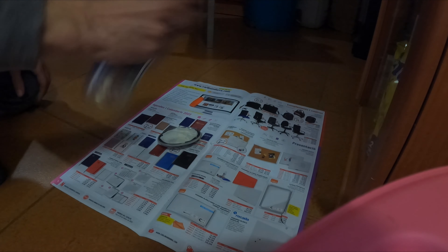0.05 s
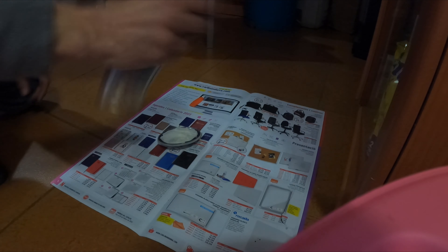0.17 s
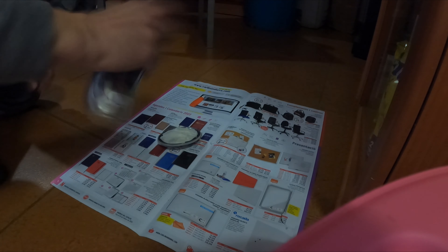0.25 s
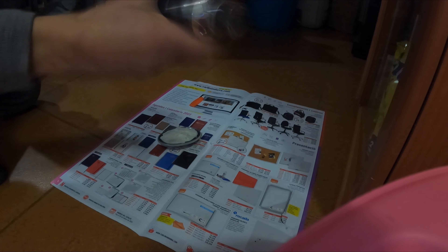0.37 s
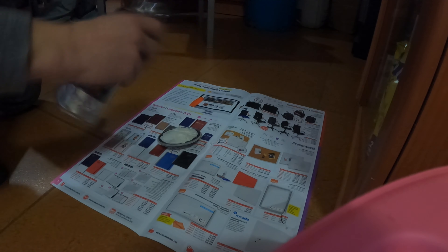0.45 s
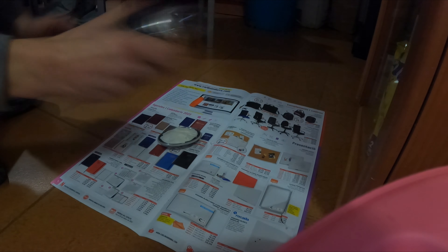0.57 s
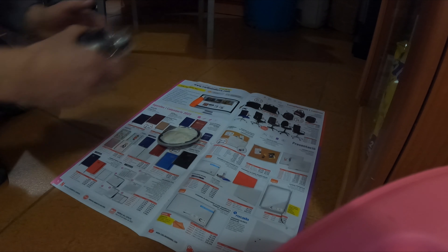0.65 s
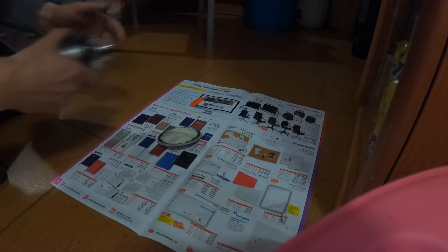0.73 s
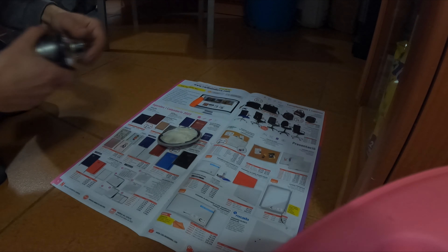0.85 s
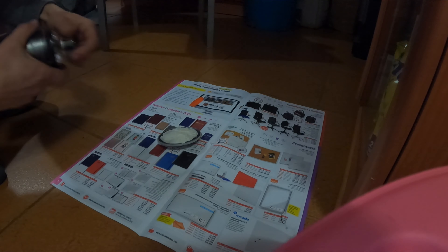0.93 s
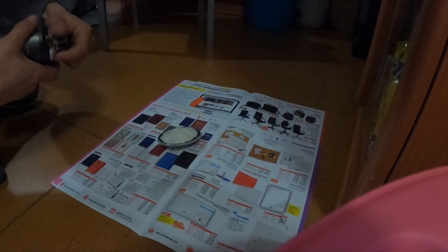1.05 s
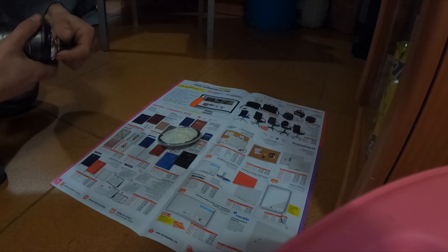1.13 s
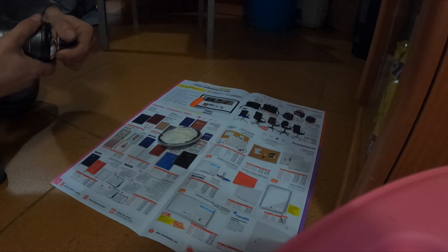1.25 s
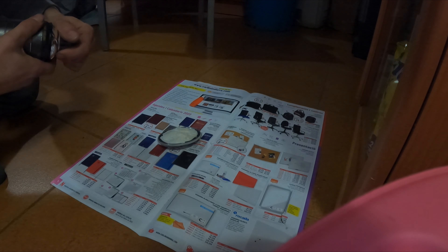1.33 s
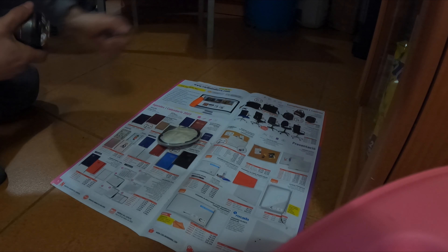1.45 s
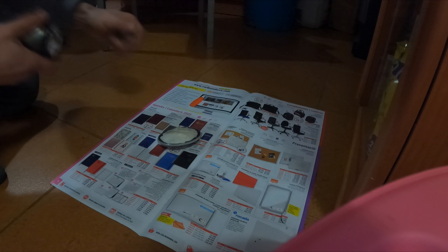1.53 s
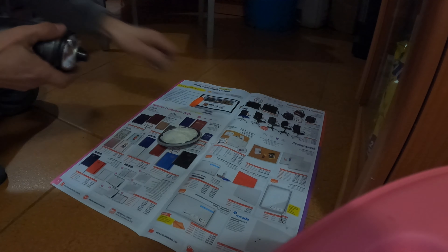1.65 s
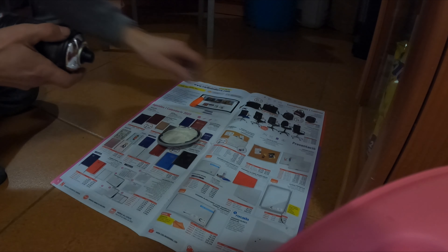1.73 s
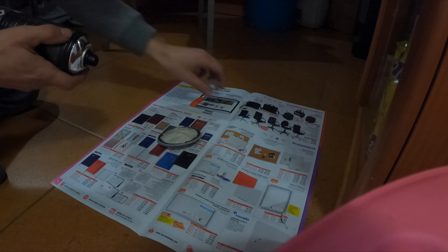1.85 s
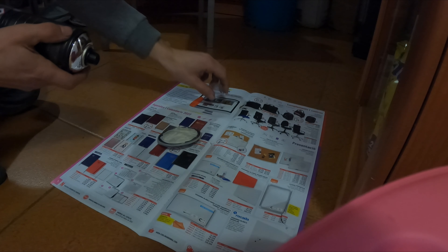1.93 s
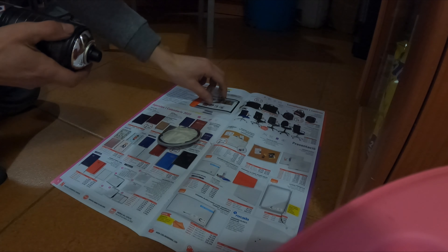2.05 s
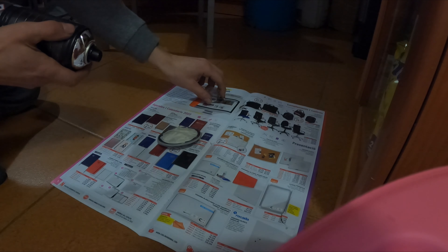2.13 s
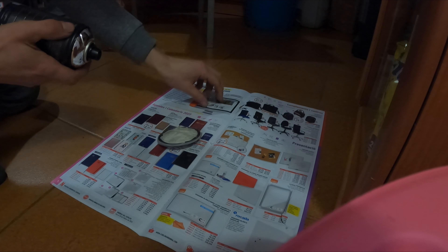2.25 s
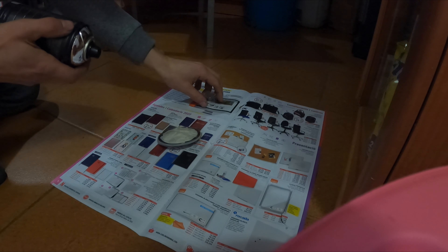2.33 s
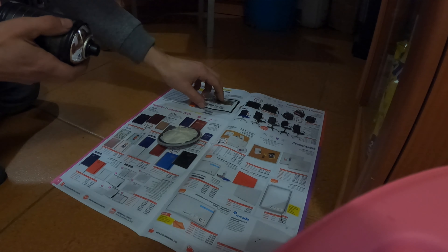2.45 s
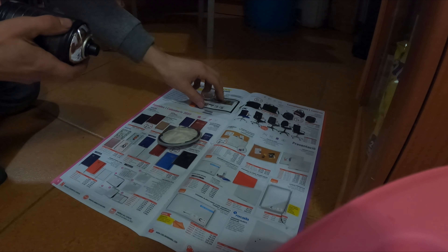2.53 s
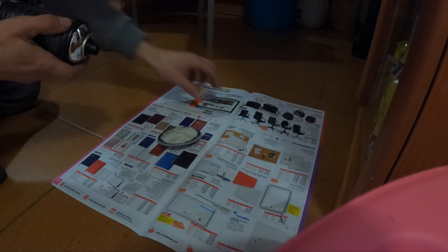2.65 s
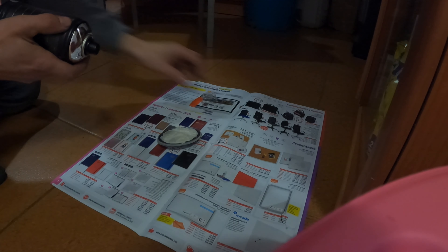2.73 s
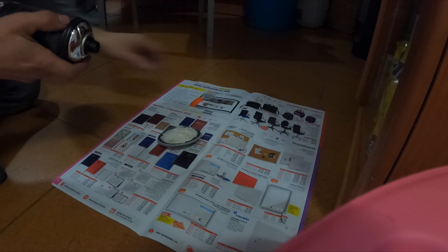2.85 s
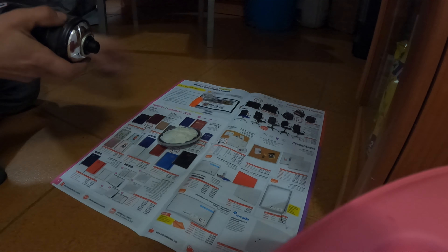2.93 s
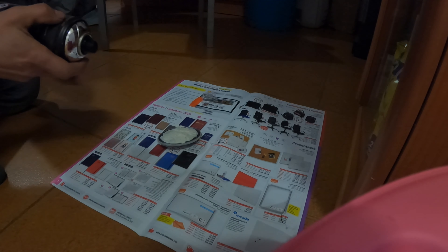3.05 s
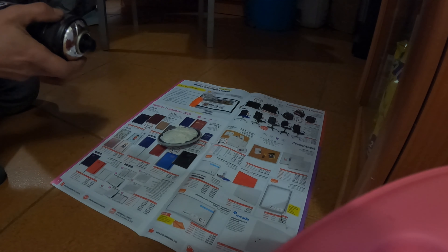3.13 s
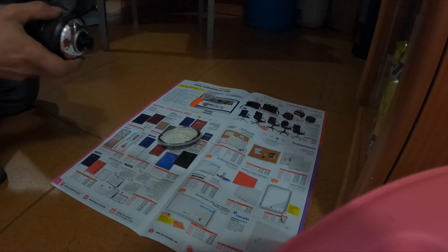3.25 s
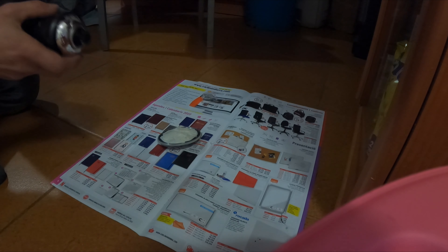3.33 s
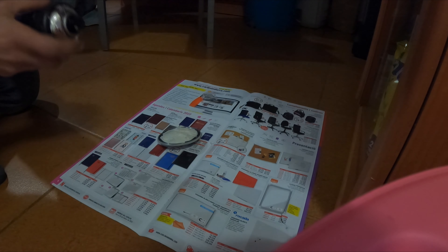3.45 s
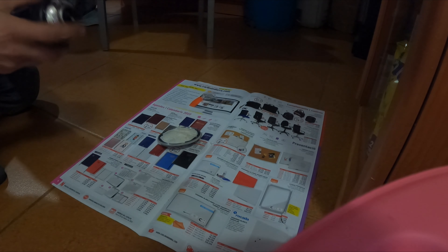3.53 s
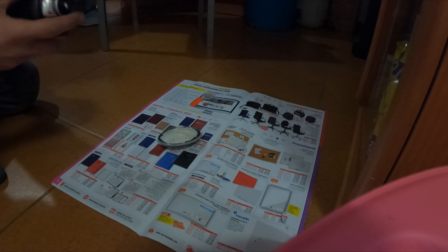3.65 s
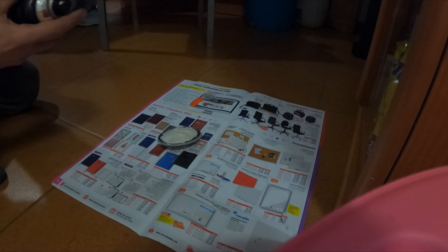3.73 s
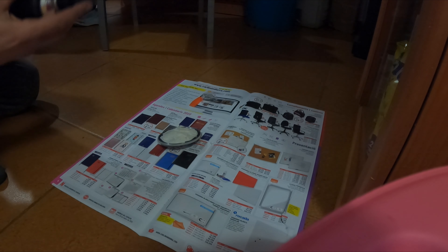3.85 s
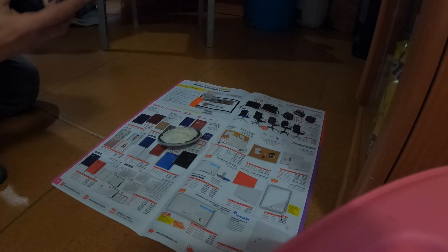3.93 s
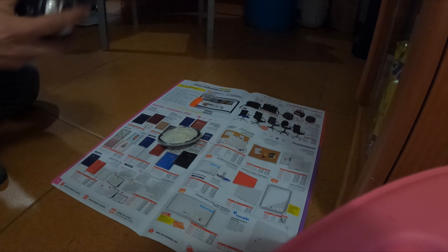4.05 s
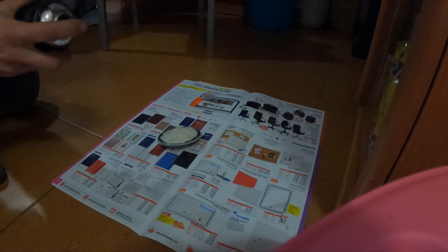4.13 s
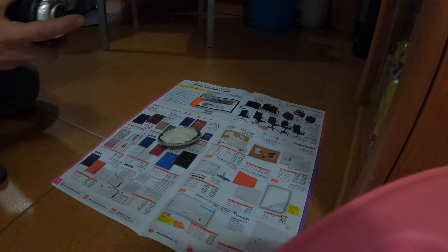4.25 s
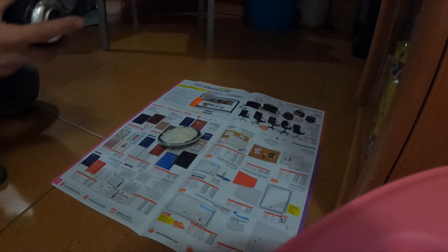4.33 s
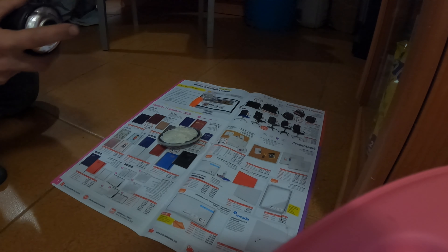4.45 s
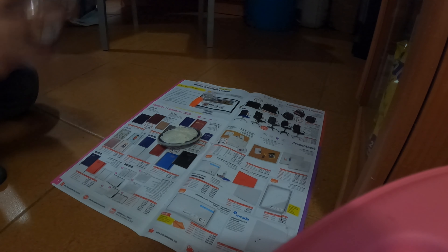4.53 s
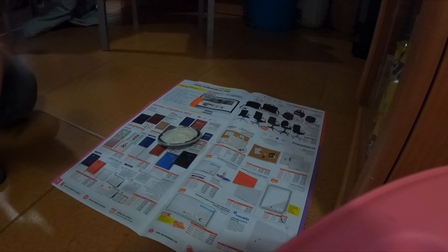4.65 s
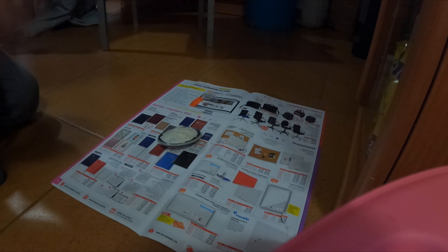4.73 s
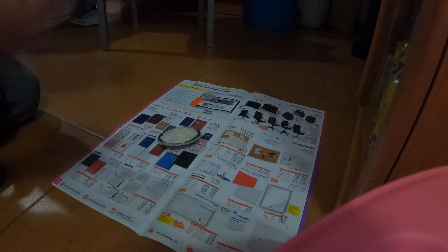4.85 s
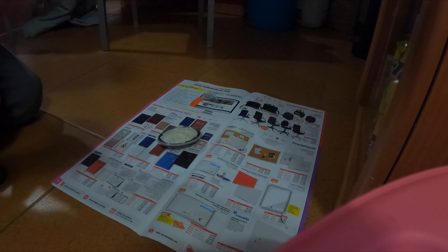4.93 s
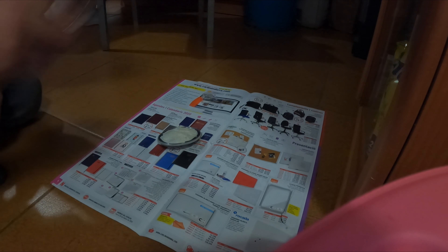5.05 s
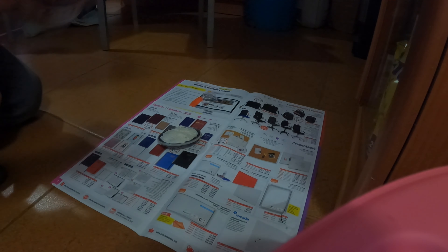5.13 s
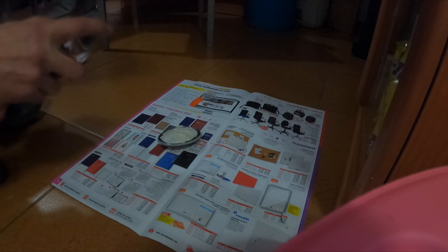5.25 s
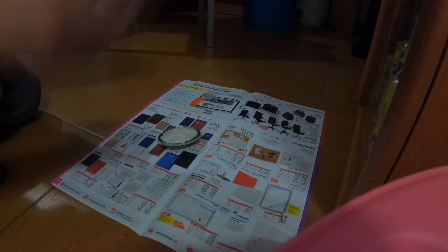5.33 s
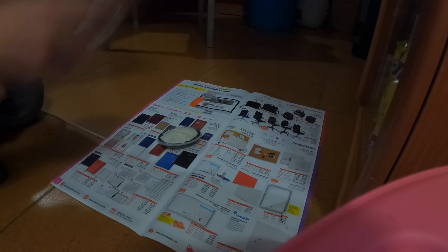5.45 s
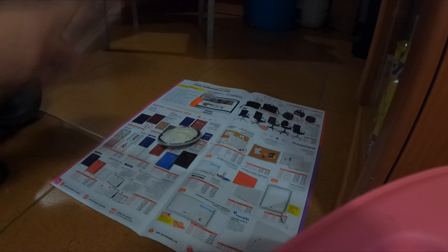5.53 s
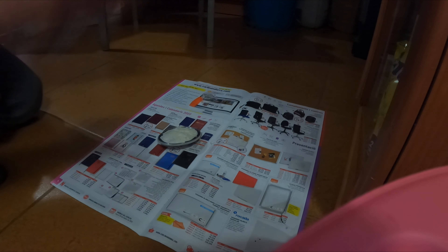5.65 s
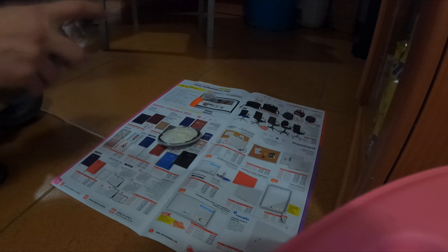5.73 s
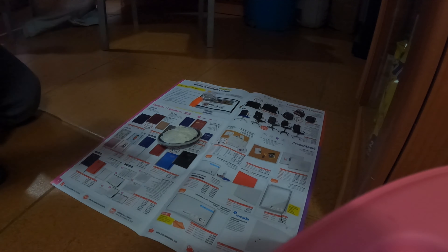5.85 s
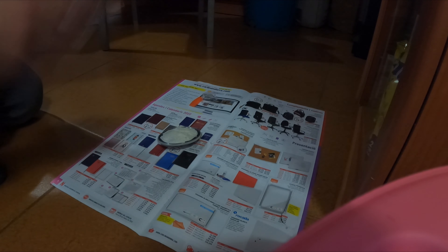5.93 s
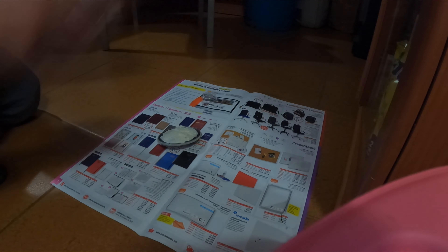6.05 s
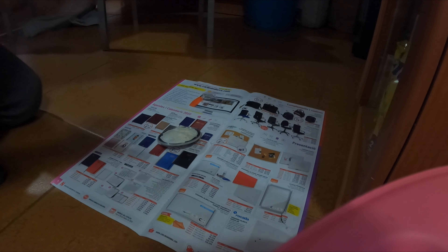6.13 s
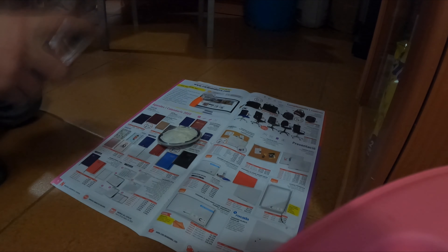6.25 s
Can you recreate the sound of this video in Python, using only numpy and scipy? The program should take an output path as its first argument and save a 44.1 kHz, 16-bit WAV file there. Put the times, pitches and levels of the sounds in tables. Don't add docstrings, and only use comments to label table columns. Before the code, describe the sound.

Close, dry rattle of a mixing ball in a small aerosol can: loose swirling, tumbling to rest, faint taps, then fast vigorous shaking.

```python
import sys
import numpy as np
from scipy import signal
from scipy.fft import rfft, irfft
from scipy.io import wavfile

SR = 44100
rng = np.random.default_rng(int(sys.argv[2]) if len(sys.argv) > 2 else 0)


def materialize(psi):
    bounded = np.clip(np.atleast_2d(psi).T, -1, 1)
    quanta = np.round(bounded * 32767).astype(np.int16)
    wavfile.write(sys.argv[1], SR, quanta)


def elevation(decibels):
    levels = np.asarray(decibels, float)
    return 10 ** (levels / 20)


N = 277389

# frequency in Hz, density in dB per Hz
ROOM_TONE = [(29, -45), (50, -18.5), (107, -13), (195, -6), (230, -16.5), (285, -21), (836, -25.5),
             (1450, -24.5), (2960, -41), (7510, -48.5), (15000, -68)]
ROOM_TONE_DB = -73
HUM_HZ, HUM_WIDTH_HZ, HUM_DB = 194.6, 9.4, -64
RUMBLE_HZ, RUMBLE_WIDTH_HZ = 30.7, 9.9
HUM_LEFT_DB, RUMBLE_LEFT_DB = -1.5, -1
# time in seconds, level in dB
RUMBLE = [(0, -50), (1.8, -55), (2.85, -63.5), (3.08, -47), (3.3, -69.5), (3.9, -71), (4.3, -55),
          (4.9, -56.5), (6.29, -64)]

# time in seconds, left minus right in dB
PLACE = [
    (0.0, -0.5),
    (0.95, 1.5),
    (6.29, 0.9),
]
# frequency in Hz, level in dB, 60 dB decay in seconds
BOTTOM = [(338, -2.5, 0.019), (465, -7.5, 0.026), (643, -9, 0.035)]
WALL = [(941, -0.5, 0.021), (1098, 2.5, 0.012), (1265, 1.5, 0.014), (1500, -1.5, 0.017), (1750, 0, 0.018),
        (1950, 2, 0.012), (2316, 2.5, 0.0069), (2550, 3.5, 0.015)]
DOME = [(3330, -2.5, 0.0067), (4010, -3, 0.0095), (4336, -2, 0.012), (4740, -2.5, 0.0086),
        (5180, -6.5, 0.022), (5500, 3, 0.0025), (5770, -4, 0.008)]
RIM = [(6080, -2.5, 0.021), (6790, 5, 0.0081), (7450, 3.5, 0.013), (7854, -1, 0.012), (8590, -5, 0.0097),
       (9650, -9, 0.013), (11270, -12, 0.0067), (11900, -11.5, 0.0096), (14100, -24, .004)]
PART_DB = [-24.5, 1.5, 1, 2.5]
BODY_LOW_HZ, BODY_TOP_HZ = 750, 15140
FOCUS_DB = 17.5
BLOW_SPREAD_DB, BEAM_DB = 2.4, 4.5
DETUNE = 0.039
CRACK, CRACK_S = 0.9, 0.0004
CONTACT_CYCLES = 0.12
# time in seconds, rim level in dB
GRIP = [(0, -8), (1.4, -3), (1.95, -8.5), (2.2, -3), (3.6, 1.5), (4.7, 0), (5.5, -5.5), (6.29, -5)]

# start in seconds, wall level in dB, wall pitch in Hz, end caps level in dB
SWIRL = [(0.015, -18.5, 1750, -17.5), (0.0769, -19.5, 2130, -6.5), (0.083, -31.5, 1770, -22.5),
         (0.092, -21, 1360, -7), (0.1978, -25, 1810, -26), (0.2789, -16.5, 1440, -8),
         (0.3289, -17.5, 1640, -27.5), (0.3376, -19.5, 1470, -37), (0.4156, -24.5, 1480, -33.5),
         (0.4247, -11.5, 1880, -12), (0.4422, -14, 1700, -21.5), (0.4588, -23, 1600, -32.5),
         (0.5288, -20, 2160, -27.5), (0.604, -9.5, 2100, -12), (0.6269, -16.5, 1750, -28),
         (0.6419, -12, 1760, -13), (0.6528, -16, 1520, -39), (0.71, -19.5, 1950, -29),
         (0.6978, -24, 1900, -27), (0.7497, -21.5, 1900, -28.5), (0.7985, -17, 2030, -28),
         (0.8594, -23.5, 1900, -29.5), (0.3112, -24.5, 1770, -28), (0.1266, -20.5, 1490, -30),
         (0.345, -23.5, 1750, -34.5), (1.0001, -31, 1860, -37), (1.259, -40, 1800, -37),
         (1.3952, -30, 1750, -34.5), (1.449, -35.5, 1800, -35.5), (0.8664, -21, 1560, -28),
         (0.911, -24.5, 2070, -40), (1.0067, -27, 1410, -34.5), (1.063, -29.5, 2200, -31.5),
         (1.188, -31, 990, -34.5), (1.2707, -26.5, 1160, -33.5)]
# start in seconds, wall level in dB, wall pitch in Hz, end caps level in dB
TUMBLE = [(1.4111, -21.5, 1890, -25), (1.426, -23.5, 1810, -27.5), (1.468, -19, 1620, -23),
          (1.472, -12, 1730, -27.5), (1.4749, -19, 1760, -33), (1.485, -31.5, 1700, -21),
          (1.5565, -22, 1525, -10), (1.604, -17.5, 1666, -21), (1.638, -17.5, 1700, -25),
          (1.6681, -30.5, 1570, -32), (1.7234, -19, 1440, -23.5), (1.7617, -26, 1430, -26.5),
          (1.801, -24, 1440, -24.5), (1.805, -23, 2120, -10.5), (1.876, -25, 1500, -10.5),
          (1.9106, -24.5, 1870, -15.5), (1.939, -32, 2050, -19), (1.964, -31, 2180, -21),
          (1.9714, -23, 2120, -9.5), (1.986, -30, 1790, -21), (2.009, -35.5, 2300, -15.5),
          (2.035, -33, 1830, -26), (2.048, -23, 1905, -19), (2.053, -47, 2120, -27),
          (2.0686, -42, 2210, -20.5), (2.087, -51, 1880, -27), (2.1012, -51, 1620, -33),
          (2.1133, -30, 2050, -24.5)]
# start in seconds, wall level
# in dB, wall pitch in Hz, end caps level in dB
TAPS = [(2.183, -41, 2510, -27), (2.252, -37, 2130, -31), (2.2587, -31, 2170, -23.5),
        (2.288, -36, 2080, -34.5), (2.394, -38.5, 2310, -39), (2.4847, -31.5, 1460, -57),
        (2.4933, -26, 1800, -56), (2.498, -37, 1890, -56), (2.504, -40, 1500, -56), (2.667, -60, 2400, -55),
        (2.685, -61, 2420, -59), (2.7932, -43, 2720, -44.5), (3.595, -23.5, 2820, -22),
        (3.648, -28, 1950, -27), (3.685, -31, 1500, -31.5), (3.7087, -30, 2130, -31.5),
        (3.974, -41, 2300, -35.5), (4.224, -39.5, 1710, -39.5), (4.2725, -27, 2500, -28),
        (4.296, -29, 1800, -29), (4.3235, -35, 1750, -32), (4.341, -37.5, 1800, -32),
        (4.415, -36, 2450, -44), (4.491, -54.5, 2300, -43), (4.6073, -26.5, 2520, -25.5),
        (4.6168, -23, 2190, -24), (4.627, -30, 2320, -23.5), (4.7251, -32, 2400, -24),
        (4.731, -29, 2310, -22.5), (4.7528, -30, 1650, -23), (4.7573, -26, 1580, -17.5),
        (4.8064, -26, 1670, -20),
        (2.5105, -53, 2000, -39), (2.537, -58, 2000, -48), (2.612, -60, 2300, -57),
           (2.652, -68, 2400, -57), (2.745, -52, 2550, -53), (2.7707, -48, 2550, -52),
           (2.868, -63, 2550, -64), (2.946, -63, 2300, -62.5), (2.9718, -60.5, 2400, -61),
           (3.0025, -52, 2400, -51), (3.0541, -56, 2300, -58), (3.07, -50, 2210, -47),
           (3.087, -39, 2300, -46), (3.094, -50, 2430, -42), (3.1308, -49, 2300, -52),
           (3.2032, -62, 2390, -62), (3.467, -72.5, 2300, -63), (3.4891, -62, 2300, -51.5),
           (3.495, -52, 1294, -57), (3.533, -56, 2500, -57), (3.542, -47, 2500, -49),
           (3.5597, -51.5, 2500, -43), (3.727, -38, 2200, -34.5), (3.74, -37.5, 2100, -37),
           (3.8991, -39, 1200, -34), (4.234, -41, 2400, -40.5), (4.3021, -29, 2470, -25),
           (4.306, -32, 2300, -27.5), (4.404, -41, 2420, -58)]
# start in seconds, wall level in dB, wall pitch in Hz, end caps level in dB, rim over dome in dB
STROKES = [(4.7011, -22.5, 1500, -9.5, -1.5), (4.8291, -11.5, 1610, -28, -3),
           (4.8371, -33, 1890, -5.5, 0.5), (4.842, -41, 2050, -11, -1), (4.944, -12.5, 1950, -15, 5),
           (4.949, -12, 1930, -12.5, 3.5), (5.039, -27, 1700, -3, -3.5), (5.0412, -36, 1740, -10, -4),
           (5.068, -14, 2570, -7.5, -10), (5.168, -12, 2100, -19, 5.5), (5.1817, -11, 1620, -17.5, 3),
           (5.184, -12, 1670, -17, 6), (5.2783, -16.5, 1580, -6.5, 3.5), (5.287, -15, 2440, -11, 3.5),
           (5.299, -19.5, 2100, -14.5, 3.5), (5.4147, -7, 2000, -13, 4.5), (5.5221, -15, 2060, -5, 1),
           (5.5431, -26, 1950, -7, -8), (5.6562, -8, 1660, -15, 4.5), (5.66, -22, 1400, -16.5, 4),
           (5.7604, -17, 2000, -7.5, -10), (5.7614, -20, 2000, -6, -5.5), (5.7891, -20.5, 2450, -4.5, 0.5),
           (5.8821, -14, 2510, -15, 6), (5.9046, -12, 1560, -14, 1.5), (6.022, -9, 2500, -7.5, -0.5),
           (6.0227, -18, 2480, -9.5, 2.5), (6.1519, -13, 1690, -11, 4.5), (6.154, -20.5, 1660, -16.5, 2.5),
           (6.2801, -15, 2000, -6.5, -1), (6.285, -20.5, 1190, -18, -3), (6.2875, -34, 1980, -11, 1)]
# start in seconds, wall level in dB, end caps level in dB
GLANCES = [(4.976, -22, -22), (5.0162, -15, -20.5), (5.0225, -13, -22), (5.122, -50, -21),
           (5.1356, -23.5, -34), (5.1507, -18, -29), (5.2495, -13.5, -24), (5.3233, -28, -16),
           (5.3451, -19.5, -15.5), (5.3607, -19, -20), (5.471, -20.5, -28), (5.5163, -16.5, -31),
           (5.535, -27, -21), (5.6053, -18.5, -26), (5.7062, -17, -25), (5.712, -19, -24),
           (5.7516, -16, -42), (5.8076, -44, -20), (5.846, -33, -24.5), (5.964, -13.5, -24.5),
           (5.9692, -15, -20), (6.04, -45, -23), (6.0706, -21.5, -34), (6.09, -22, -26),
           (6.1008, -17.5, -24.5), (6.2237, -17.5, -23.5), (6.2392, -13.5, -22), (5.228, -18, -24),
           (5.54, -29, -25), (5.643, -27, -36), (5.739, -31, -46), (6.008, -29, -30), (6.126, -24, -29),
           (6.149, -25, -25)]
GLANCE_HZ, GLANCE_SPREAD = 1600, 0.11

# time in seconds, peak level in dB, end caps over wall in dB,
# seconds to rise 10 dB, seconds to fall 10 dB (tiny or negative: abrupt)
SURGES = [(0, -33, -7, .06, 0.09), (0.124, -32.5, -8.5, -0.6, 0.05), (0.204, -39, -6, -0.24, 0.8),
          (0.333, -33, -7, 0, 0.12), (0.449, -32.5, -6.5, 0.02, .06), (0.533, -36.5, -5, 0.02, 0.1),
          (0.649, -34.5, -5.5, 0.01, 0.16), (0.711, -35, -2, -0.02, 0.11), (0.779, -35, -5.5, -0.37, 0.12),
          (.87, -38, -7, -0.5, 0.14), (1.011, -42, -6, -0.44, 0.42), (1.19, -46, -5.5, -0.3, 0.15),
          (1.36, -47.5, -4, -0.2, .15), (1.48, -38, -13, 0.09, -0.02), (1.65, -46.5, -9, .04, 0.6),
          (1.86, -52, 6, 0.1, .146), (2.08, -48.5, .5, -0.05, 0.2), (2.3, -53.5, 0.5, -0.36, 0.06),
          (2.5, -47.5, -14, -0.02, 0.06), (2.58, -59.5, -8, -0.1, 0.16), (2.68, -67, -2, -1.2, -0.16),
          (2.77, -62.5, -4.5, -0.3, 0.02), (2.86, -70, -11, -1.2, 0), (2.99, -67.5, -3, -0.5, 0.15),
          (3.083, -61.5, -6, -0.03, 0.1), (3.17, -69.5, -11, 0.5, 0.3), (3.545, -59, 1, 0.03, 0.53),
          (3.66, -46, -6, 0.01, 0), (3.74, -48, -3, 0.02, 0.35), (3.88, -49, -2.5, 0.0251, .3),
          (4.18, -51, -3, 0.0842, -0.2), (4.308, -44.5, -2.5, 0.02, 0.06), (4.43, -61.5, -1.5, .04, 0.32),
          (4.624, -42.5, 1, -0.04, .06), (4.73, -38, 3.5, -0.02, .065), (4.88, -39.5, -3, 0.03, .175)]
TAIL_BEND = 1.3
STROKE_S, FIRST_WASH_S = 0.2355, 5.23
WASH_DB, WASH_ENDS_DB = -37, -7.5
WASH_RISE_S, WASH_FALL_S = 0.058, 0.099
SPRAY_LAG_S, SPRAY_DB, SPRAY_ENDS_DB = 0.25, -53, 6
GRAINS_PER_S, GRAIN_SPREAD_DB = 3500, 2.5
SURGE_DB, PATCH_DB = 1.53, 3.8
# time in seconds, level in dB
TICKING = [(0, -6), (2.15, 1), (2.3, 4), (2.5, -7.5), (3.55, -9), (4.55, -6.5), (4.7, -1), (6.29, -2)]
TICKS_PER_S, TICK_DB = 71, 0.5
# time in seconds, pitch in Hz
PAINT_PITCH = [(0, 1700), (.6, 1750), (.72, 1950), (.9, 1960), (1.2, 1750), (2.3, 2330), (2.53, 1630),
               (2.74, 2500), (3.17, 2200), (3.4, 1400), (3.6, 2500), (3.74, 2130), (3.92, 2180),
               (4.02, 1830), (4.16, 2100), (4.3, 2280), (5.1, 2200), (6.29, 1930)]
# time in seconds, pitch in Hz
CAP_PITCH = [(0, 4500), (.35, 4900), (.75, 4240), (1.1, 4170), (1.6, 4900), (2.2, 5100), (3.55, 5820),
             (3.8, 5600), (3.9, 6340), (4.07, 5600), (4.22, 4770), (4.4, 5900), (5, 4800), (6.29, 5030)]
# time in seconds, level in dB
POOLING = [(0, -3), (1.5, -4), (2.1, -12), (3.68, -14), (3.78, -1), (4.1, -2), (4.2, -10), (4.7, -8),
           (5, -3), (6.29, -3)]
PAINT_FOCUS, CAP_FOCUS = 5, 2
UNDER_RATIO = 0.53
WET_BOTTOM_DB, WET_RIM_DB = -25.5, -3.5
WET_GRIP = 0.53

# time in seconds, peak level in dB, length in seconds, left minus right in dB
PUFFS = [(4.808, -30, 0.0056, 1), (4.841, -22.5, 0.0074, 4), (4.845, -28, 0.0038, -11),
         (4.861, -28, 0.015, 1), (4.895, -34.5, 0.0072, 1), (5.043, -26.5, 0.0017, 3),
         (5.285, -31.5, 0.0027, -10), (5.303, -16, 0.0048, -8.5), (5.544, -31.5, 0.0024, -6),
         (5.791, -27.5, 0.0041, -9.5), (6.022, -39, 0.004, -2)]

FLOOR_ECHO_S, FLOOR_ECHO_DB = (0.001384, 0.0018), -17
ROOM_T60_S, ROOM_TOP_T60_S, ROOM_DB = 0.24, 0.24, -10
ROOM_LOW_SHARED, ROOM_SHARED = 0.7, 0.66
CUTOFF_HZ = 16600


def rms_one(x):
    return x / np.sqrt(np.mean(x ** 2) + 1e-20)


def in_time(rows):
    s, *columns = np.transpose(rows)
    return [np.interp(np.arange(N) / SR, s, c) for c in columns]


def pan(x, left_db):
    return np.array([x * elevation(left_db / 2), x * elevation(-left_db / 2)])


def band(x, low_hz, high_hz):
    edges = [low_hz, min(high_hz, 0.45 * SR)]
    return signal.sosfilt(signal.butter(3, edges, "band", fs=SR, output="sos"), x)


def drift(rate):
    r = np.exp(-80 * np.pi * rate / SR)
    slow = signal.lfilter([1], [1, -2 * r, r * r], rng.standard_normal(N // 40 + 2002))[2000:]
    return np.interp(np.arange(N) / 40, np.arange(len(slow)), rms_one(slow - slow.mean()))


def ring(clicks, hz, t60):
    r = elevation(-60 / (t60 * SR))
    w = 2 * np.pi * hz / SR
    return signal.lfilter([0, np.sin(w)], [1, -2 * r * np.cos(w), r * r], clicks + 1e-18)


def resonant_noise(hz, width_hz):
    t60 = np.log(1000) / (np.pi * width_hz)
    once = ring(rng.standard_normal(N + SR), hz, t60)
    return rms_one(ring(once, hz, t60)[SR:])


def room_tone(alike=0.59):
    hz = np.maximum(np.fft.rfftfreq(N, 1 / SR), 1)
    tone_hz, tone_db = np.transpose(ROOM_TONE)
    shape = elevation(np.interp(np.log(hz), np.log(tone_hz), tone_db))
    mid, side = irfft(rfft(rng.standard_normal((2, N))) * shape, N)
    upper = np.sqrt(np.mean(shape[hz > 250] ** 2) * np.mean(hz > 250))
    both = np.sqrt(1 + alike) * mid + np.sqrt(1 - alike) * side * [[1], [-1]]
    return elevation(ROOM_TONE_DB - 1.5) * both / upper


def house():
    hum = elevation(HUM_DB) * resonant_noise(HUM_HZ, HUM_WIDTH_HZ)
    rumble = elevation(in_time(RUMBLE)[0]) * resonant_noise(RUMBLE_HZ, RUMBLE_WIDTH_HZ)
    air = elevation(-73.5) * rms_one(band(rng.standard_normal(N), 49, 350))
    return pan(hum + air, HUM_LEFT_DB) + pan(rumble, RUMBLE_LEFT_DB)


def focus_db(hz, pitch_hz):
    return -FOCUS_DB * np.log2(hz / pitch_hz) ** 2


def strike(modes, at, level_db, favour_db):
    hz, mode_db, t60 = np.transpose(modes)
    strength, sign, shift, aim = rng.standard_normal((4, len(at), len(modes)))
    share = elevation(BLOW_SPREAD_DB * strength + mode_db + favour_db) * np.sign(sign)
    beam_db = BEAM_DB * np.sqrt(hz / 5000) * (aim + 0.71)
    sides = pan(share, beam_db).transpose(1, 0, 2)
    t = np.arange(SR // 20) / SR
    decay = elevation(-60 * t / t60[:, None])
    contact = (1 + CRACK * np.exp(-t / CRACK_S)) * (1 - np.exp(-t * hz.min() / CONTACT_CYCLES))
    out = np.zeros((2, N + len(t)))
    for i, db, gains, detune in zip(at, level_db, sides, 1 + DETUNE * shift):
        rings = np.sin(2 * np.pi * np.outer(hz * detune, t)) * decay
        sound = gains @ rings * contact
        out[:, i:i + len(t)] += elevation(db) * sound / np.abs(sound).max()
    return out[:, :N]


def ball():
    pitches = GLANCE_HZ * np.exp(GLANCE_SPREAD * rng.standard_normal(len(GLANCES)))
    glances = [(s, wall, hz, ends) for (s, wall, ends), hz in zip(GLANCES, pitches)]
    blows = [row[:4] for row in STROKES] + SWIRL + TUMBLE + TAPS + glances
    s, wall_db, pitch_hz, dome_db = np.transpose(blows)
    at = np.minimum(np.round(s * SR).astype(int), N - 1)
    rim_db = dome_db + in_time(GRIP)[0][at]
    rim_db[:len(STROKES)] += [row[4] for row in STROKES]
    wall_favour_db = focus_db(np.array(WALL)[:, 0], pitch_hz[:, None])
    knock = strike(BOTTOM, at, wall_db + PART_DB[0], 0)
    wall = strike(WALL, at, wall_db + PART_DB[1], wall_favour_db)
    dome = strike(DOME, at, dome_db + PART_DB[2], 0)
    rim = strike(RIM, at, rim_db + PART_DB[3], 0)
    wall = band(band(wall, 780, 3600), BODY_LOW_HZ, 4400)
    return band(knock, 260, 1200) + wall + band(dome, 2600, 6100) + band(rim, 4500, BODY_TOP_HZ)


def surging():
    strokes = FIRST_WASH_S + STROKE_S * np.arange(5)
    washes = [(s, WASH_DB, WASH_ENDS_DB, WASH_RISE_S, WASH_FALL_S) for s in strokes]
    sprays = [(s - STROKE_S + SPRAY_LAG_S, SPRAY_DB, SPRAY_ENDS_DB, WASH_RISE_S, WASH_FALL_S)
              for s in strokes]
    s, peak_db, ends_db, rise, fall = np.transpose(SURGES + washes + sprays)[:, :, None]
    rise = np.maximum(rise, 0.005)
    fall = np.maximum(fall, 0.02)
    t = np.arange(0, N, 64) / SR
    db = peak_db - 10 * np.maximum((t - s) / fall, (s - t) / rise) ** TAIL_BEND

    def summed(levels):
        total_db = 10 * np.log10(np.sum(elevation(2 * levels), axis=0) + 1e-12)
        return np.interp(np.arange(N) / SR, t, total_db)

    wall, dome = summed(db), summed(db + ends_db)
    return wall, dome, dome + WET_RIM_DB + WET_GRIP * in_time(GRIP)[0]


def patter(modes, favour_db, ticks, ring_share):
    sizes = elevation(GRAIN_SPREAD_DB * np.minimum(rng.exponential(1, N), 5)) * rng.choice([-1, 1], N)
    taps = sizes * (rng.random(N) < GRAINS_PER_S / SR)
    dealt = rng.integers(0, len(modes), N)
    total, power = 0, 0
    for k, (hz, db, t60) in enumerate(modes):
        gain = elevation(db + favour_db(hz) + PATCH_DB * drift(7.0))
        clicks = taps * (dealt == k) + elevation(TICK_DB) * ticks * (-1) ** k
        total = total + gain * rms_one(ring(clicks, hz, ring_share * t60))
        power = power + gain ** 2
    return total / np.sqrt(power)


def slosh():
    wall_db, dome_db, rim_db = surging()
    pitch_hz, cap_hz, under_db = [in_time(rows)[0] for rows in (PAINT_PITCH, CAP_PITCH, POOLING)]
    tick_db = in_time(TICKING)[0] + 3.92 * np.minimum(rng.exponential(1, N), 4)
    ticks = elevation(tick_db) * (rng.random(N) < TICKS_PER_S / SR)
    surge = 0.54 * drift(35.0)

    def wall_colour(hz):
        main = PAINT_FOCUS * focus_db(hz, pitch_hz)
        under = under_db + PAINT_FOCUS * focus_db(hz, UNDER_RATIO * pitch_hz)
        return np.maximum(main, under)

    def dome_colour(hz):
        return CAP_FOCUS * focus_db(hz, cap_hz)

    def level(db):
        return elevation(db + SURGE_DB * (surge + drift(25)))

    wall = level(wall_db) * patter(WALL, wall_colour, ticks, ring_share=1.1)
    dome = level(dome_db) * patter(DOME, dome_colour, ticks, ring_share=0.45)
    rim = level(rim_db) * patter(RIM, lambda hz: 0, ticks, ring_share=0.33)
    bottom_level = elevation(wall_db + WET_BOTTOM_DB + SURGE_DB * surge)
    bottom = bottom_level * patter(BOTTOM, lambda hz: 0, ticks, ring_share=0.27)
    wall = band(band(wall, 880, 3900), BODY_LOW_HZ, 3800)
    return band(bottom, 360, 900) + wall + band(dome, 2100, 7500) + band(rim, 7400, 14000)


def floor_echo(x):
    n = np.arange(N)
    return np.array([elevation(FLOOR_ECHO_DB) * np.interp(n - s * SR, n, x, left=0) for s in FLOOR_ECHO_S])


def room(x):
    t = np.arange(SR // 2) / SR
    common, left, right = rng.standard_normal((3, len(t)))
    low, top = [np.sqrt(c) * common + np.sqrt(1 - c) * np.array([left, right])
                for c in (ROOM_LOW_SHARED, ROOM_SHARED)]
    low = band(low, 100, 2000) * elevation(-60 * t / ROOM_T60_S)
    top = band(top, 2000, 18000) * elevation(-60 * t / ROOM_TOP_T60_S)
    tail = (low + top) * np.minimum(t / 0.0022, 1) ** 2
    return signal.fftconvolve(x[None], tail / np.sqrt(np.sum(tail ** 2) / 2))[:, :N]


def puffs(cut_hz=22):
    out = np.zeros((2, N))
    for s, peak_db, length, left_db in PUFFS:
        shove = np.hanning(max(round(length * SR), 8))
        start = round((s - length / 2) * SR)
        out[:, start:start + len(shove)] -= pan(elevation(peak_db) * shove, left_db)
    return signal.sosfilt(signal.butter(2, cut_hz, "high", fs=SR, output="sos"), out)


def scene():
    can = ball() + slosh()
    mid = can.mean(axis=0)
    place = pan(np.ones(N), in_time(PLACE)[0])
    near = place * (can + floor_echo(mid) + elevation(ROOM_DB) * room(mid))
    return near + puffs() + house() + room_tone()


def low_pass(x):
    return signal.sosfilt(signal.butter(12, 16660, fs=SR, output="sos"), x)


def record(dry):
    cut = signal.sosfilt(signal.cheby2(10, 50, CUTOFF_HZ, fs=SR, output="sos"), dry)
    mix = np.clip(cut, -1, 1)
    return low_pass(mix)


dry = scene()
out = record(dry)
materialize(out)
```